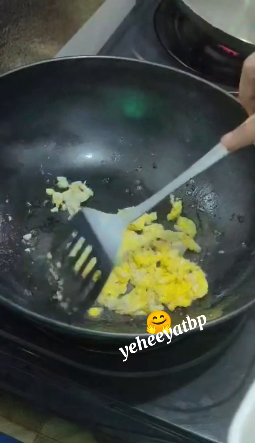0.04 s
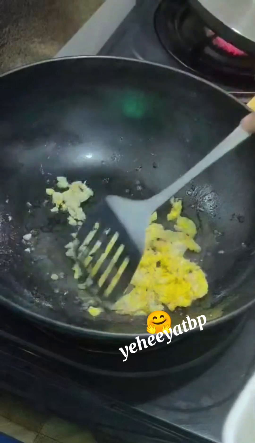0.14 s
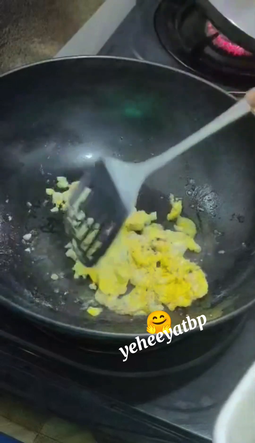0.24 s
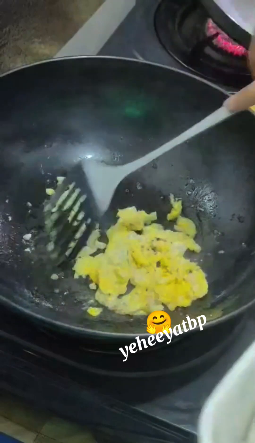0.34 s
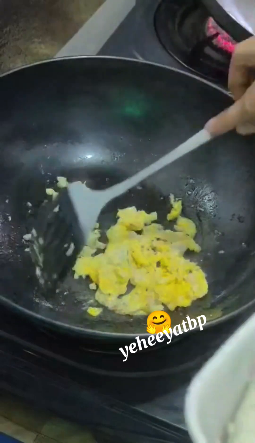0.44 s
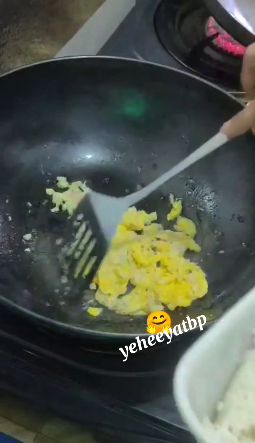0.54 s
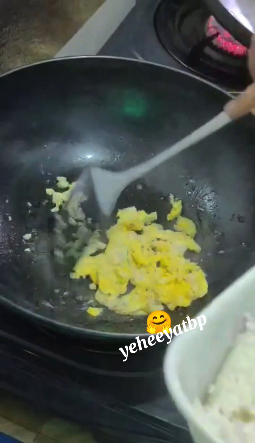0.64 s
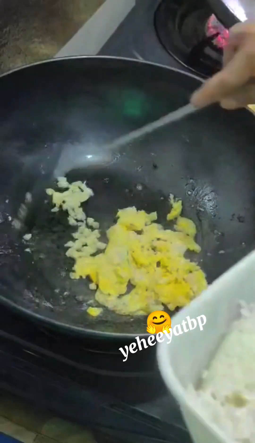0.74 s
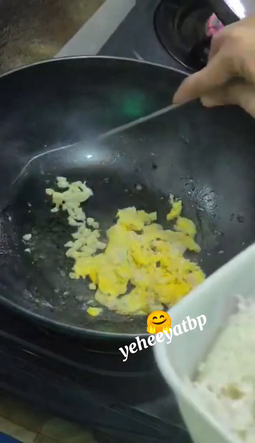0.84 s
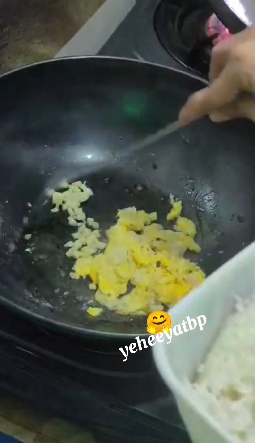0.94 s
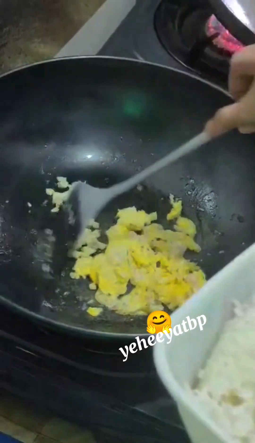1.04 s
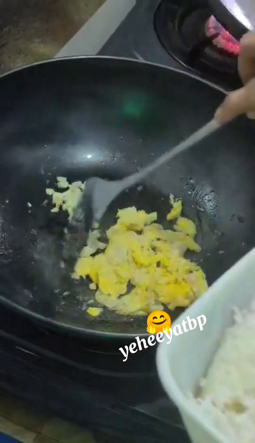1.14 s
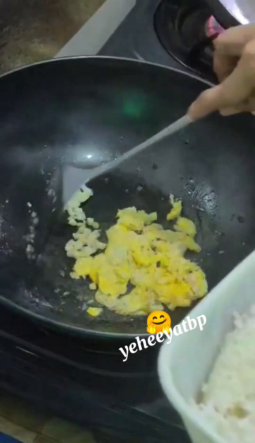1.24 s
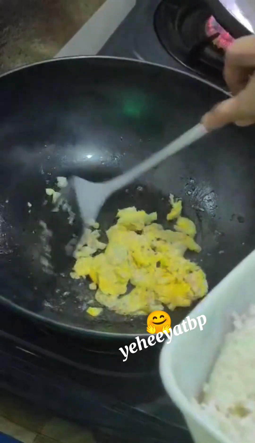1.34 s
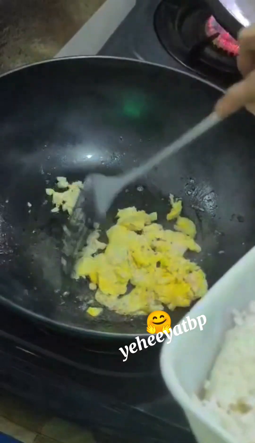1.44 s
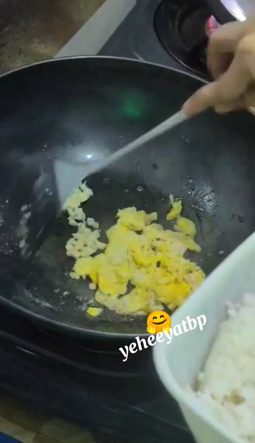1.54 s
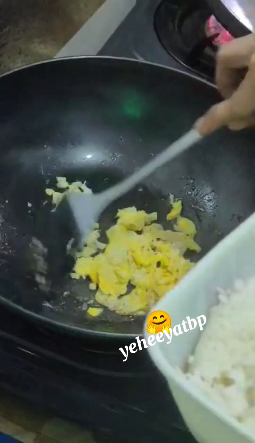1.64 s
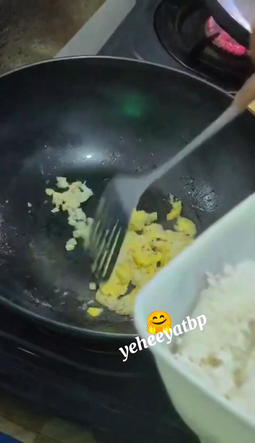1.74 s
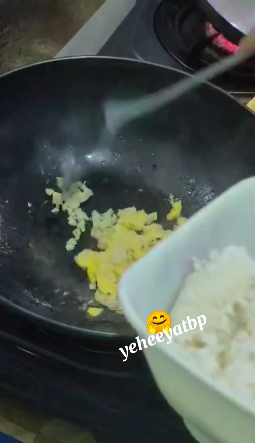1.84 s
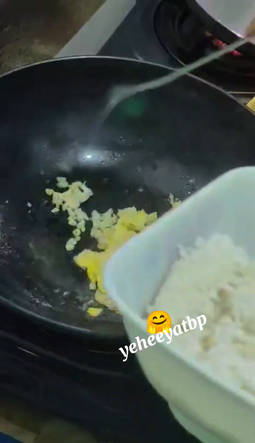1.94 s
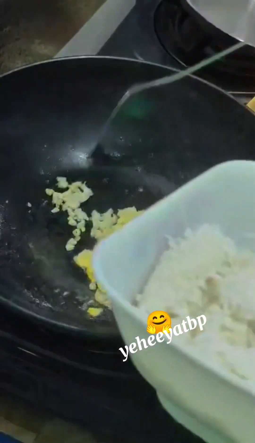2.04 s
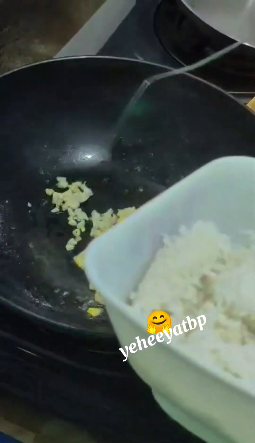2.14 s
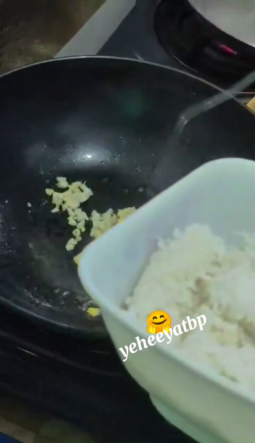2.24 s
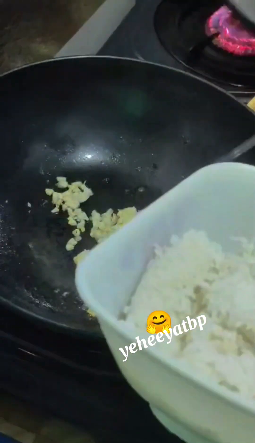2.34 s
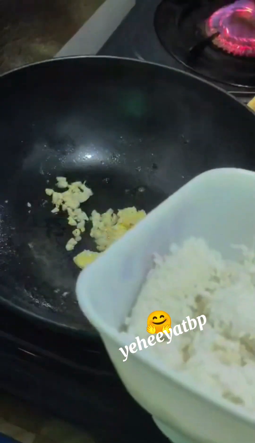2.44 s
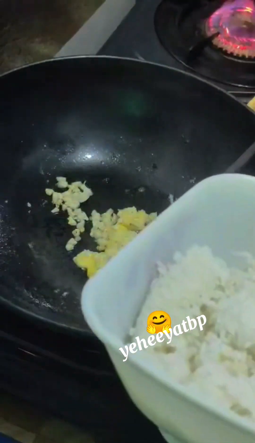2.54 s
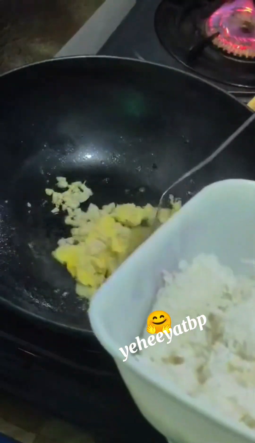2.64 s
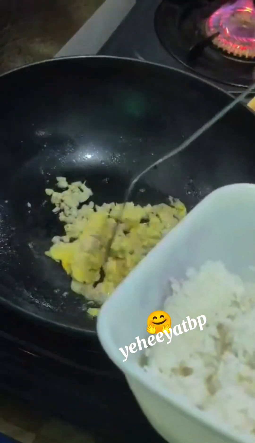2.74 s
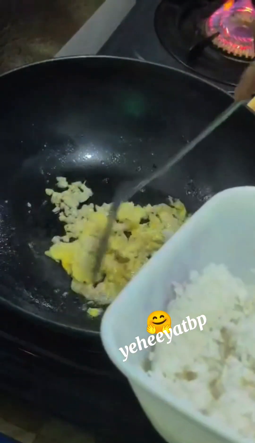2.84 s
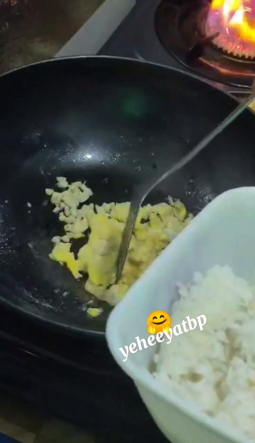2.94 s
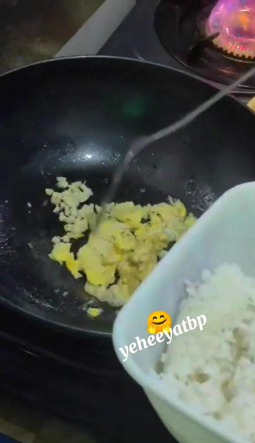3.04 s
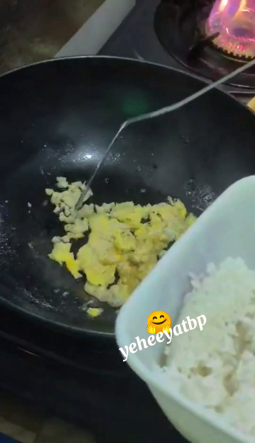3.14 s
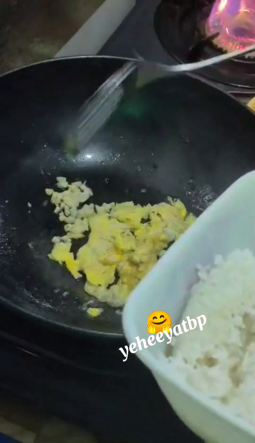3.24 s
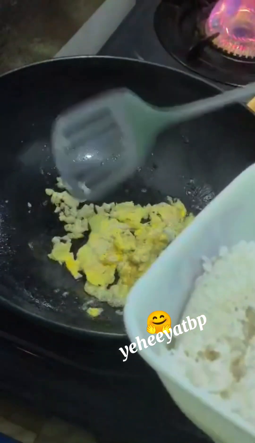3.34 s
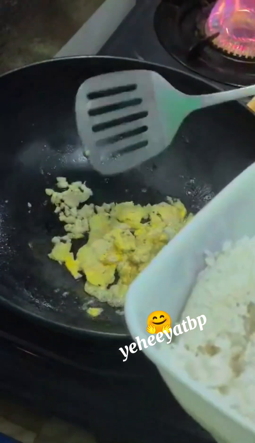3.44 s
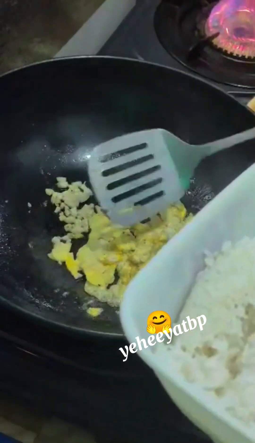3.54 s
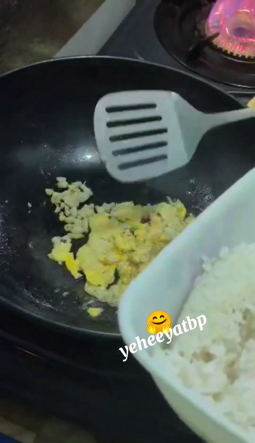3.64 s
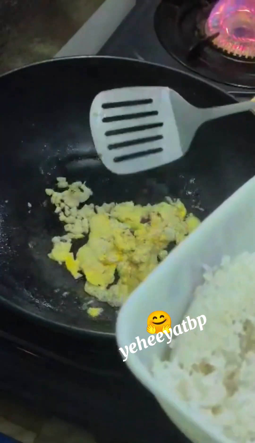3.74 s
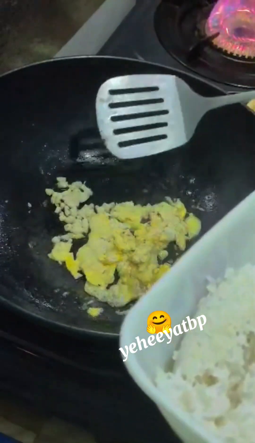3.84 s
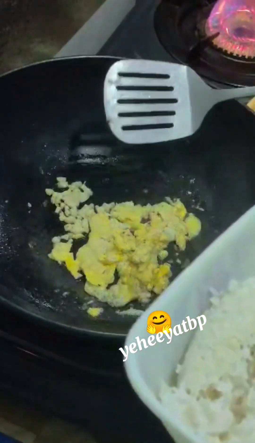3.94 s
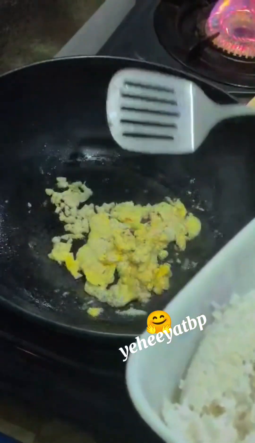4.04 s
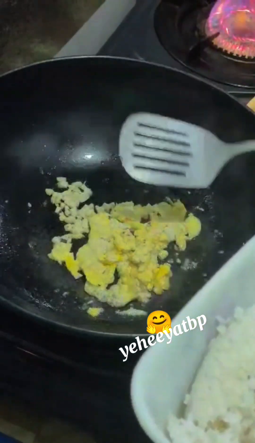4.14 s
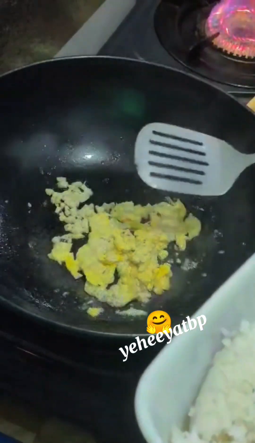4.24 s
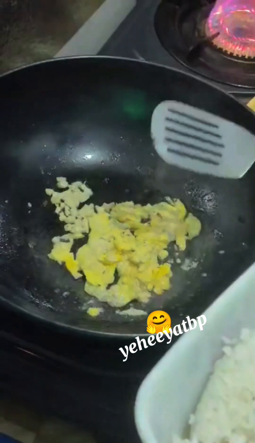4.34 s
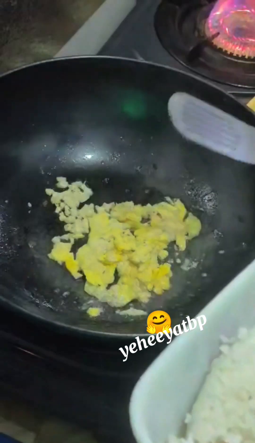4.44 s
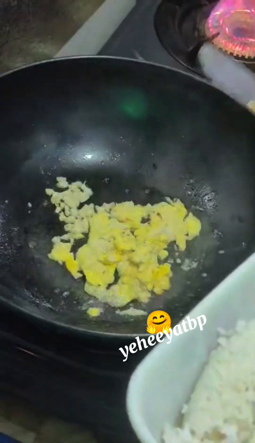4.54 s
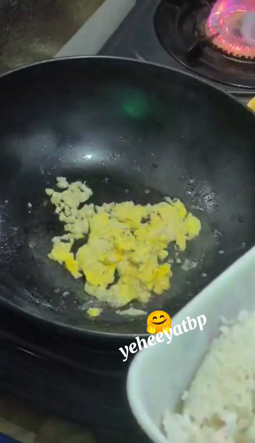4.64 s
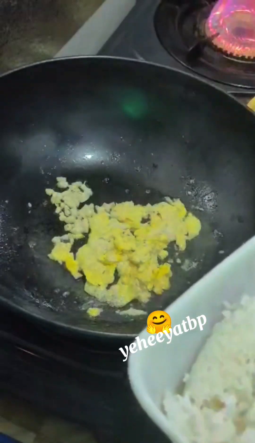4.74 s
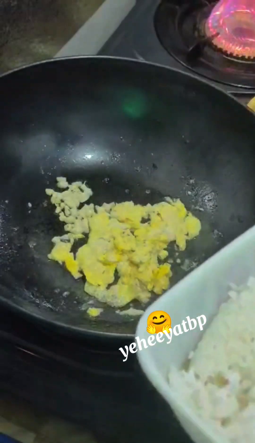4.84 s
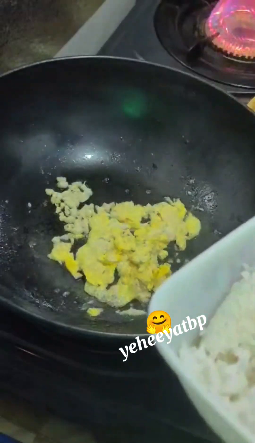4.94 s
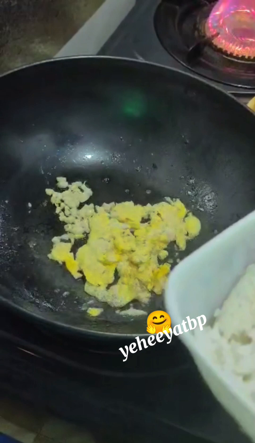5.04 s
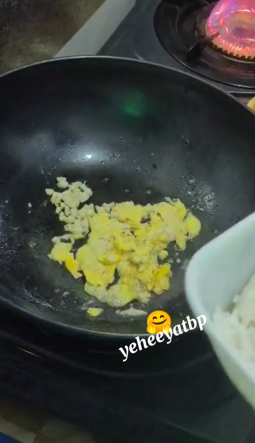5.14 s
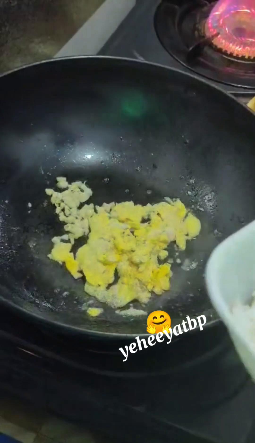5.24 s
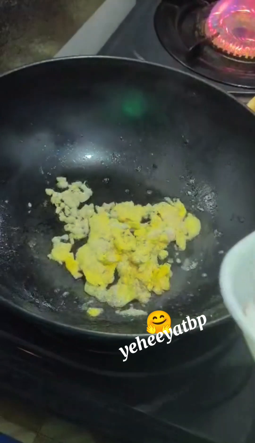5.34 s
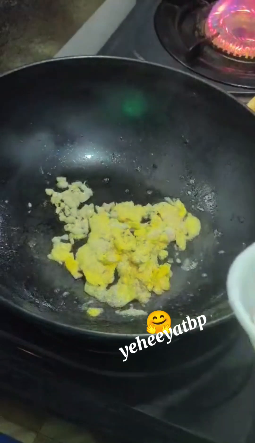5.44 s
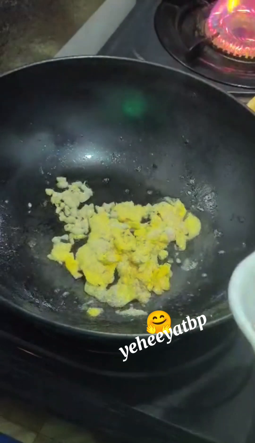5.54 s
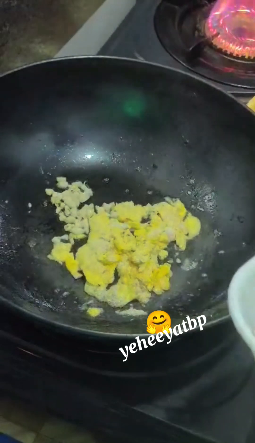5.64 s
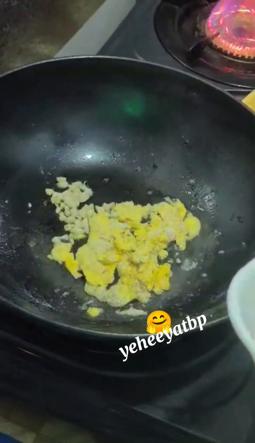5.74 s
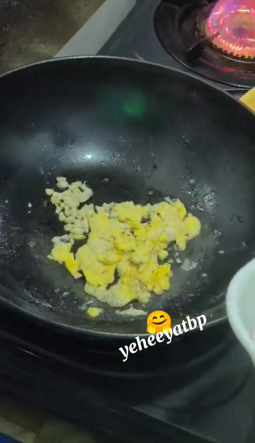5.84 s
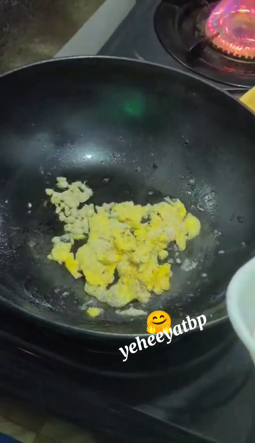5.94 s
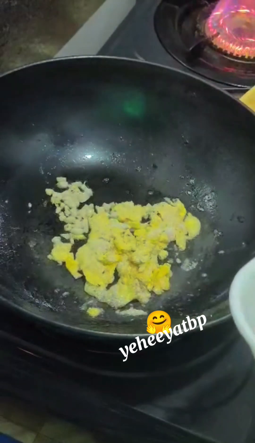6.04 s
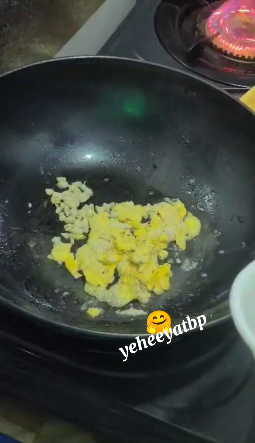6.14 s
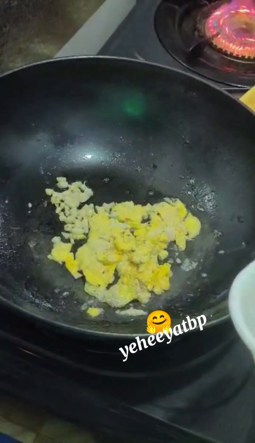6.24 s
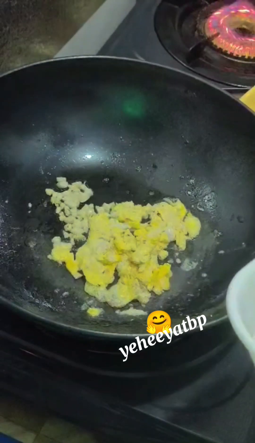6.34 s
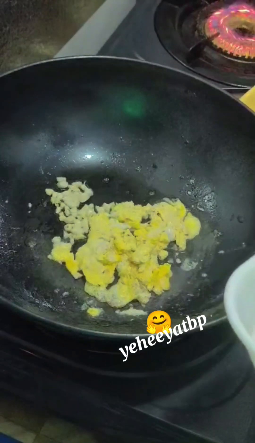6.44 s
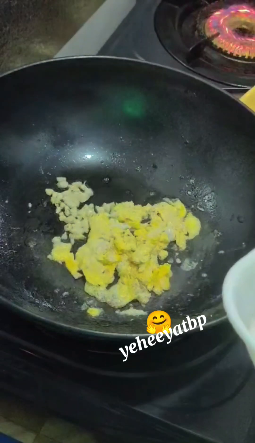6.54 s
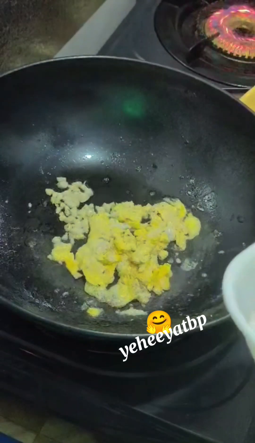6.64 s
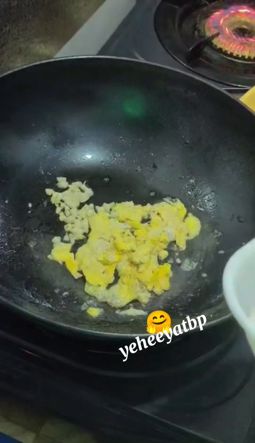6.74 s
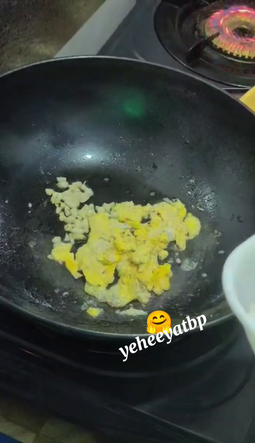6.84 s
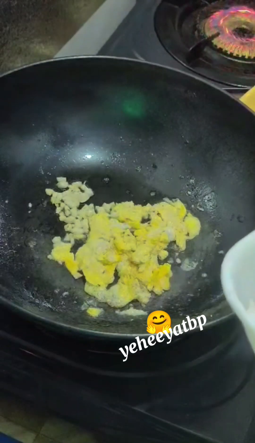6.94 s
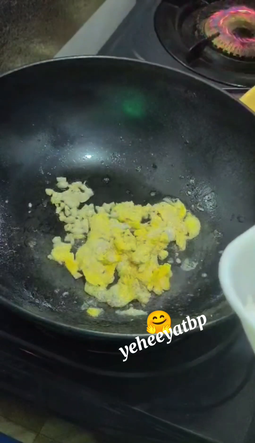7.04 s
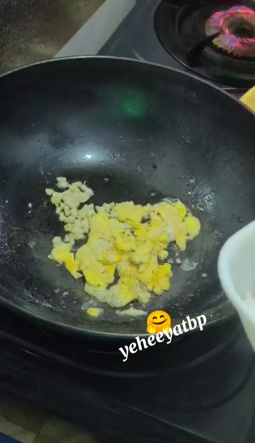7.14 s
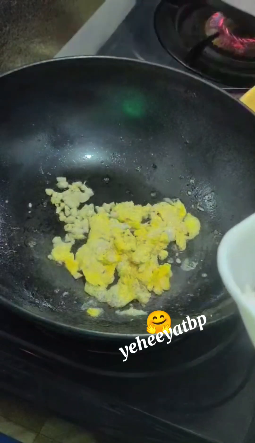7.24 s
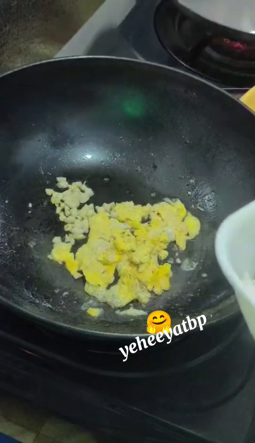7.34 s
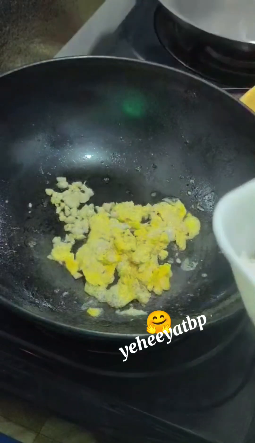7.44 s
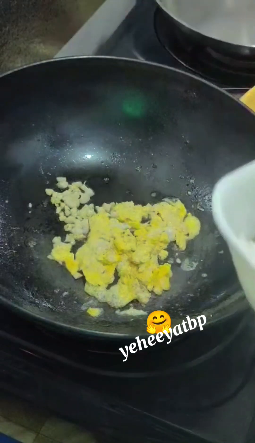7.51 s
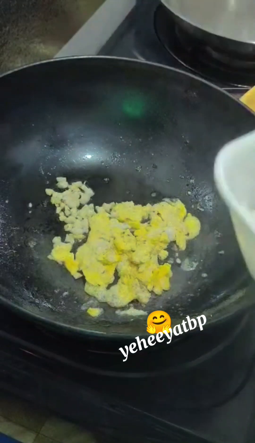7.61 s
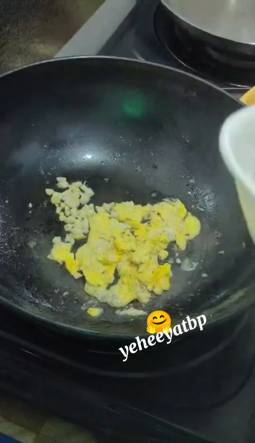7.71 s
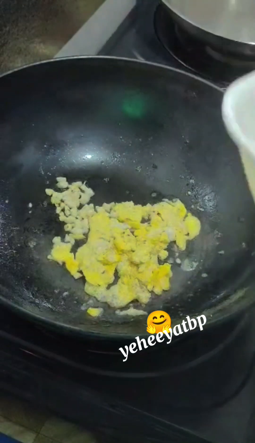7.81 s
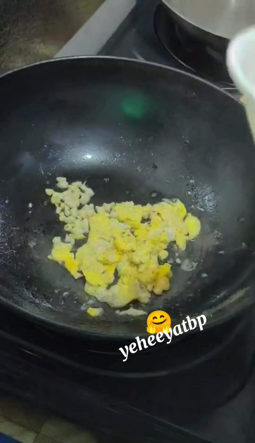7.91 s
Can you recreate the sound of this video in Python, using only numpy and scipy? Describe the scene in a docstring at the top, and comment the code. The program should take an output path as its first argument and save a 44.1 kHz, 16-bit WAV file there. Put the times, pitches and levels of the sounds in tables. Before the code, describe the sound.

A metal spatula clanks and scrapes through frying egg, leaving popping oil, a faint fluttering flame and a pot set down.

```python
"""Egg sizzles in a wok in a small kitchen, each bursting bubble a tiny impulse. For the first 4.5 s a steel
spatula knocks, scrapes and slides through it, exciting the modes of the bowl; then it is laid aside. From
1.4 s the oil spits, and later things are shifted nearby. Near 6 s something hollow is pushed along the
counter. At 6.4 s the back burner starts to flutter, and at 7.6 s it flares as a pot is set down on it.
All is heard at the two microphones of a phone held just above the stove."""
import sys
import numpy as np
from scipy import signal
from scipy.fft import rfft, irfft
from scipy.io import wavfile
from scipy.ndimage import uniform_filter1d

SR = 44100
rng = np.random.default_rng(int(sys.argv[2]) if len(sys.argv) > 2 else 0)


def inscribe(sig):
    """Save sig as 16-bit PCM at rate SR to the path in sys.argv[1].

    A 1-D sig is mono; a 2-D sig holds one channel per row.
    Samples are clipped to [-1, 1] before scaling.
    """
    pcm = np.round(np.clip(np.atleast_2d(sig).T, -1, 1) * 32767)
    wavfile.write(sys.argv[1], SR, pcm.astype(np.int16))


N = 351469
TIME = np.arange(N) / SR

# Levels in the tables are relative: each source applies its own gain.
# spectrum of the kitchen air: frequency_hz, level_db
AIR_SPECTRUM = [(20, 16), (100, 0.5), (250, 0.5), (500, 11.5), (900, -10.5), (2000, -26), (12000, -6)]
# spectrum of the deep rumble of hand, stove and flame: frequency_hz, level_db
RUMBLE_SPECTRUM = [(20, -11), (40, 1.5), (75, 1.5), (120, 1.5), (250, -9.5), (800, -34.5)]
# the hand shifts its grip on the phone: start_s, hold_s, level_db
GRIPS = [(4.02,0.028,-62), (4.34,0.049,-62.5), (5.26,0.13,-51.5)]
# spectrum of the burner's roar: frequency_hz, level_db
ROAR_SPECTRUM = [(60, -23), (115, -35), (155, 7.5), (200, -5.5), (260, 3), (340, -4), (450, -20.5),
                 (900, -20.5), (2500, -65)]
# the flame lifts and catches again: start_s, pitch_hz, note_db, boom_db
GULPS = [(6.454,250,-57,-61.5), (6.485,292,-55.5,-68), (6.526,240,-51,-55), (6.575,243,-58,-58),
         (6.621,234,-53,-51), (6.724,275,-51,-53), (6.766,242,-61,-54), (6.829,254,-49,-52),
         (6.865,270,-56,-54), (6.964,305,-47,-48.5), (7.008,251,-47,-63), (7.048,290,-59,-48),
         (7.098,248,-45.5,-48.5), (7.194,253,-51.5,-48.5), (7.272,225,-46,-52), (7.348,250,-60.5,-52),
         (7.385,250,-51.5,-60), (7.425,250,-53.5,-63.5), (7.493,243,-45,-52)]
# soft rubs of the spatula sliding through the egg, and of things shifted nearby:
# start_s, length_s, pitch_hz, level_db
RUBS = [(0.69, 0.033, 1260, -41), (1.053, .11, 577, -56), (1.215, 0.084, 703, -50.5),
        (1.379, 0.095, 590, -56.5), (4.023, 0.044, 1076, -60.5), (4.639, 0.04, 925, -69.5),
        (4.726, 0.048, 1870, -65), (4.821, 0.11, 992, -65.5), (5.067, 0.05, 532, -54),
        (6.67, 0.063, 1600, -54), (6.678, 0.054, 430, -59), (7.608, 0.013, 700, -34)]
# soft contacts of food, tub and hand: start_s, level_db, pitch_hz
BUMPS = [(1.624, -45.5, 540), (1.683, -47.5, 427), (2.007, -58, 503), (2.028, -58, 220), (2.17, -49, 460),
         (2.179, -59.5, 253), (4.034, -52, 514), (4.045, -54.5, 179), (5.244, -48.5, 484),
         (5.699, -51.5, 275)]
# resonances of the hollow object: pitch_hz, width_hz, level_db
HOLLOW_MODES = [(487, 73, 9), (585, 40, 4), (1035, 38, 12.5), (1770, 240, -4.5), (2550, 430, -6)]
# its jerks along the counter: start_s, hold_s, level_db
PUSHES = [(5.845,0.044,-43), (5.995,0.058,-47), (6.1,0.13,-61), (6.285,0.0052,-53)]
# how hard the egg fries: time_s, fizz_db
FRYING = [(0.0, -46), (0.11, -47.5), (1.78, -51.5), (2.1, -58), (2.44, -60), (2.73, -45.5), (3.15, -47),
          (4.24, -50), (4.95, -58.5), (5.3, -54), (5.39, -46.5), (5.68, -57.5), (5.97, -87), (6.24, -56),
          (6.37, -56), (7.43, -60.5), (7.84, -53), (7.97, -51)]
# hot oil boils up where wet egg settles: start_s, hold_s, level_db
BOILS = [(1.18,0.016,-45), (1.975,0.0063,-41), (2.355,0.052,-49), (2.94,0.16,-43), (3.45,0.034,-53),
         (5.71,0.19,-51.5), (6.37,0.046,-52.5), (6.86,0.2,-56)]
# filter for the fizz of the oil film: frequency_hz, gain_db
FIZZ_SPECTRUM = [(3500, -14), (5200, -7), (7200, 6), (9000, 0.5), (11000, -10.5), (13000, -5.5)]
# filter for the crackle under the egg: frequency_hz, gain_db
CRACKLE_SPECTRUM = [(300, -9), (600, -11.5), (1000, -14), (2000, 2.5), (3600, 6.5), (5000, -4), (7000, -13)]
# sharp pops of drops bursting in oil, and the bright snap of two utensil knocks (5.245 s, 5.719 s):
# start_s, pop_db, crack_re_pop_db, spray_re_pop_db
POPS = [(1.4332,-33,-4,-22), (1.486,-17,6,-27), (1.5547,-19.5,-1,-10), (1.569,-28,-3,-28),
        (1.7969,-18.5,5.5,-16), (1.821,-31,-8,-13.5), (1.8425,-34.5,23.5,6), (2.1736,-69,-5,-24.5),
        (2.3589,-36,1.5,-29), (2.657,-18.5,7.5,-17), (2.758,-31,-8,-16), (3.3329,-36.5,4,-10.5),
        (3.4523,-27,-4,-22), (3.469,-24,6,-18), (3.5315,-23.5,10.5,-17), (3.562,-26.5,5,-14),
        (3.6579,-22.5,-12,-19.5), (3.8837,-27.5,-16,-8.5), (3.8988,-30,7.5,-22), (3.9819,-29,-16.5,-28),
        (4.1141,-14,-15,-52), (4.188,-26.5,-3,-14), (4.2284,-22,-8,-19), (4.2566,-22.5,-3,-20),
        (4.3084,-19.5,-12.5,-20.5), (4.3615,-30.5,-13,-12.5), (4.494,-41,-13,-27.5), (4.533,-26,-13,-26.5),
        (4.7073,-35,-8,-18), (4.7593,-32,-5,-14), (4.9259,-50,0.5,-19.5), (4.9522,-41,8,-20),
        (4.9832,-45.5,3,-25), (5.245,-20.5,2,-12), (5.2885,-34,2,-23), (5.331,-30.5,5,-19),
        (5.4183,-30,-6,-23), (5.7191,-19.5,-4,-15), (6.3679,-20.5,-1,-18), (6.863,-37.5,4.5,-4),
        (6.87,-33,-8,-17), (6.908,-36.5,10.5,-27), (6.928,-32,-9,-33), (6.9824,-24,-5.5,-43),
        (7.4763,-24,-16,-22)]
# normal modes of the wok: pitch_hz, level_db, t60_s
WOK_MODES = [(152,-24.5,.5), (246,-20.5,.3), (288.5,-21.5,1), (411.4,0,0.13), (436.6,-10.5,.38),
             (450,-3,0.096), (513.8,-1,.2), (556,-3,.2), (614,-7,.3), (736.5,-10,0.1), (781,-8.5,0.19),
             (847,-9,.2), (1064,0,0.23), (1120,-0.5,.15), (1346,-6,.18), (1474,-7.5,.22), (1630,-7.5,.14),
             (2160,-4.5,.13), (2255,-2,.17), (2330,-3,.18), (2556,-2.5,.15), (2850,-6.5,.12),
             (3060,-10.5,.14), (3735,0.5,.16), (3790,-3,.12), (3985,-8,0.13), (4100,-5,.11), (4470,0,.13),
             (4800,-6.5,.11), (4890,-5,.13), (5465,-5.5,0.15), (6080,-3.5,.12), (6080,-5.5,0.21),
             (6500,-1.5,.11), (6865,-3.5,0.055), (7195,-3.5,0.075), (7460,-8,.1), (7650,-8,.1),
             (8177,-9,.13)]
# dense, quickly damped vibration of blade and pan: frequency_hz, level_db
STEEL_SPECTRUM = [(100, -22.5), (160, -18), (260, 2.5), (350, -4.5), (450, 10.5), (620, 2), (900, -4),
                  (1300, 6), (2200, 9.5), (3100, 6), (4300, 1.5), (5200, -12.5), (6900, 1), (8800, -10),
                  (10800, -26), (13000, -24)]
# the bowl hums on as the blade lifts clear: start_s, lowest_mode_db, next_two_modes_db
HUMS = [(0.069, -56.5, -48.5), (0.546, -50, -69), (0.864, -56, -55.5), (2.531, -72.5, -54.5)]
# steel sliding on cookware, and a tub slid nearby: start_s, length_s, body_db, rasp_db, edge_db
SCRAPES = [(0.009,0.024,-85,-48,-41), (0.405,0.024,-62,-46,-37.5), (0.509,0.025,-54.5,-38,-33.5),
           (0.824,0.033,-70,-40.5,-48), (0.955,0.029,-40.5,-61,-35), (0.988,0.024,-48,-65,-58),
           (1.236,0.45,-57.5,-53,-54), (1.42,0.05,-55,-41,-39.5), (1.552,0.058,-55.5,-43.5,-39.5),
           (1.816,0.062,-62,-44,-40), (2.588,0.054,-42,-38,-27), (2.957,0.069,-27,-37,-50),
           (3.447,0.028,-68,-45.5,-38.5), (3.831,0.04,-55.5,-47,-47), (4.738,0.055,-86,-51,-51.5),
           (5.284,0.19,-55.5,-60,-51.5), (5.857,0.045,-46.5,-40,-51), (6.174,0.081,-84,-59,-51),
           (6.499,0.037,-82,-46,-39.5), (7.275,0.048,-83,-55.5,-48), (7.674,0.061,-41.5,-39,-41),
           (7.812,0.02,-39,-33.5,-35), (7.833,0.027,-37,-31.5,-33)]
# timbre of a scrape in the wok and beside it: t60_s, uneven_db
SCRAPE_IN_WOK = (0.022, 2.5)
SCRAPE_ASIDE = (0.01, 1.5)
# steel striking cookware:
# start_s, boom_db, body_db, clank_db, edge_db, chatter_s, clank_hz, ring_db, blade_t60_s
KNOCKS = [(0.067,-33.5,-20.5,-23.5,-22,0.015,1250,-17.5,0.18),
          (0.139,-34.5,-39,-37,-37,0.0082,1090,-22,0.22), (0.403,-58,-67,-49,-40.5,0.003,3220,-15,0.08),
          (0.544,-32,-24.5,-19,-14,0.026,2290,-16,0.096), (0.865,-31,-21,-22.5,-18,0.013,1400,-17,.13),
          (0.979,-35.5,-33,-36.5,-27.5,0.012,1250,-20,0.13), (1.486,-68,-52,-46,-35,0.0036,3380,-15,0.11),
          (1.853,-72,-58,-39,-35,0.0059,2200,-20,0.053), (2.527,-37.5,-28.5,-33,-26.5,0.0098,1100,-18,0.29),
          (2.581,-46,-37,-32,-33,0.012,1100,-24,.15), (2.713,-54,-56.5,-36,-32.5,0.0064,2370,-18,0.2),
          (2.926,-28.5,-17,-18.5,-32.5,0.028,970,-14,.15), (3.083,-58.5,-46,-35,-34,0.014,2830,-18,0.18),
          (5.244,-51.5,-39.5,-46,-32,0.008,2500,-28,.15), (5.662,-56,-42,-41,-38.5,0.035,2150,-31,0.18),
          (5.718,-50,-42.5,-34,-38,0.0016,1490,-19,0.054), (5.811,-61,-45.5,-41,-44,0.0023,2050,-22,0.098),
          (6.339,-71,-56,-44,-54,0.0031,2400,-30,0.092), (6.491,-55,-59,-36,-39,0.0027,3260,-33,0.081),
          (7.616,-28.5,-22.5,-34,-45,0.019,1005,-33,0.19), (7.651,-46,-26.5,-24,-22.5,0.009,1950,-35,0.17),
          (7.75,-34,-33,-44,-55,0.0076,1000,-33,0.16), (7.785,-36.5,-29.5,-28,-28.5,0.012,3260,-35,0.11)]
# imbalance of the two microphones: frequency_hz, left_minus_right_db
MIC_BALANCE = [(60, -1), (110, 2.5), (200, -0.5), (370, -2), (670, 2.5), (1230, 1), (2260, 0), (4130, 3.5),
               (7560, -1.5), (13800, 9)]

STIRRING_ENDS_S, FLUTTER_FROM_S, POT_DOWN_S = 4.5, 6.43, 7.6
RING_S = 0.4  # longest ring after a knock or scrape


def undb(db):
    """Decibels to amplitude ratio."""
    return 10 ** (np.asarray(db) / 20)


def unit(x):
    """Normalisation to rms 1."""
    return x / np.sqrt(np.mean(x ** 2) + 1e-20)


def fade(t, t60):
    """Exponential decay, 60 dB in t60 seconds."""
    return np.exp(-np.log(1000) * t / t60)


def seconds(length):
    """Time axis of a short sound."""
    return np.arange(int(length * SR) + 2) / SR


def add(out, start_s, x):
    """Superposition of x on out from start_s."""
    i = max(int(start_s * SR), 0)
    out[:, i:i + x.shape[1]] += x[:, :N - i]


def envelope(t, rise_s, t60, hold_s=0):
    """Linear rise, hold and exponential decay."""
    return np.minimum(t / rise_s, 1) * fade(np.maximum(t - rise_s - hold_s, 0), t60)


def swells(events, rise_s, t60):
    """Sum of envelopes, one for each row of start_s, hold_s, level_db."""
    out = np.zeros((1, N))
    for start_s, hold_s, db in events:
        t = seconds(rise_s + hold_s + t60)
        add(out, start_s, undb(db) * envelope(t, rise_s, t60, hold_s)[None])
    return out[0]


def band(x, hz, kind, order=3):
    """Butterworth filter."""
    return signal.sosfilt(signal.butter(order, hz, kind, fs=SR, output="sos"), x)


def resonate(x, hz, width_hz):
    """Second-order resonator, gain 1 at its centre."""
    return signal.lfilter(*signal.iirpeak(hz, hz / width_hz, fs=SR), x)


def resonate_twice(x, hz, width_hz):
    """Two equal resonators in cascade."""
    return resonate(resonate(x, hz, width_hz), hz, width_hz)


def colour(x, points, size=2048):
    """Minimum-phase filter through rows of frequency_hz, gain_db."""
    hz, db = np.transpose(points)
    bins_hz = np.maximum(np.fft.rfftfreq(size, 1 / SR), 1)
    gain = undb(np.interp(np.log(bins_hz), np.log(hz), db))
    cepstrum = irfft(np.log(gain))
    cepstrum[1:size // 2] *= 2
    cepstrum[size // 2 + 1:] = 0
    response = irfft(np.exp(rfft(cepstrum)))
    return signal.fftconvolve(x, response[None], axes=1)[:, :x.shape[1]]


def noise(n, apart_hz=900):
    """Spatial coherence: noise at two close microphones is alike in the bass, unrelated in the treble."""
    mid, side = rng.standard_normal((2, n))
    side = band(side, apart_hz, "highpass", order=1) + .22 * rng.standard_normal(n)
    return np.array([mid + side, mid - side])


def wander(rate_hz):
    """Smooth random modulation with a spread near 1."""
    step = int(SR / rate_hz)
    stairs = np.repeat(rng.standard_normal(N // step + 1), step)
    return 1.3 * uniform_filter1d(stairs, step)[:N]


def clicks(n, per_s, spread_db):
    """Shot noise: impulses of random time, sign and size."""
    count = int(per_s * n / SR) + 1
    when, size, sign = rng.random((count, 3)).T
    sizes = undb(spread_db * np.minimum(-np.log(1 - size), 5)) * np.sign(sign - .5)
    return np.bincount((when * n).astype(int), sizes, n)


def background(air_db=-73, resting_hand_db=-83):
    """Airborne kitchen noise, with structure-borne rumble from the hand and from blows on the stove."""
    air = unit(colour(noise(N), AIR_SPECTRUM)) * undb(air_db + wander(15))
    hand = undb(resting_hand_db) + swells(GRIPS, rise_s=0.025, t60=0.55)
    thuds = swells([(s, 0, boom_db - 25.5) for s, boom_db, *_ in KNOCKS], rise_s=0.008, t60=0.6)
    rumble = unit(colour(noise(N), RUMBLE_SPECTRUM))
    return air + rumble * np.hypot(hand, thuds) * undb(-1)


def flame(flutter_db=-57.5, flare_db=-45.5, throat_hz=160, puff_hz=330):
    """Combustion noise: a low roar, with a note and a boom of the burner's throat at each re-ignition."""
    flutter = undb(flutter_db) * np.clip((TIME - FLUTTER_FROM_S) / 0.13, 0, 1)
    flare = swells([(POT_DOWN_S, 0, flare_db)], rise_s=0.15, t60=0.56)
    gulps, t = np.zeros((2, N)), seconds(0.35)
    tone = lambda hz: unit(np.sin(2 * np.pi * (hz * t + rng.random())))
    for start_s, pitch_hz, note_db, boom_db in GULPS:
        puff = unit(resonate_twice(noise(len(t)), puff_hz, puff_hz)) * undb(-10)
        note = (tone(pitch_hz) + puff) * envelope(t, rise_s=0.0072, t60=0.11)
        boom = tone(throat_hz) * envelope(t, rise_s=0.0072, t60=0.19)
        add(gulps, start_s, note * undb(note_db) + boom * undb(boom_db))
    roar = unit(colour(noise(N), ROAR_SPECTRUM))
    rumble = unit(colour(noise(N), RUMBLE_SPECTRUM)) * undb(-11)
    return (roar + rumble) * (flutter + flare) + gulps


def rubs(relative_width=0.47):
    """Friction noise: brief soft sliding drives one broad resonance."""
    out = np.zeros((2, N))
    for start_s, length_s, hz, db in RUBS:
        t = seconds(length_s)
        slips = noise(len(t)) * np.sqrt(np.abs(np.sin(np.pi * t / t[-1])))
        add(out, start_s, undb(db) * unit(resonate_twice(slips, hz, hz * relative_width)))
    return out


def bumps(t60=0.29, relative_width=0.33):
    """Damped resonance: a soft contact wakes only a short, hollow note."""
    out, t = np.zeros((2, N)), seconds(1.0)
    for start_s, db, hz in BUMPS:
        push = noise(len(t)) * fade(t, t60) * (1 - np.exp(-t / 0.00027))
        note = resonate_twice(push, hz, hz * relative_width)
        add(out, start_s, note * undb(db) / np.std(note[:, :int(.03 * SR)]))
    return out


def hollow_drag():
    """Forced vibration: rough sliding on the counter drives the modes of a hollow body."""
    slips = noise(N) * undb(1.4 * wander(150))
    body = unit(sum(undb(db) * resonate(slips, hz, width_hz) for hz, width_hz, db in HOLLOW_MODES))
    return band(body, 164, "highpass") * swells(PUSHES, rise_s=0.0088, t60=0.3) * undb(1)


def ticks(strongest_hz=2800, db_per_octave=-3):
    """Impulse response: single wet bubbles snap through broad resonances, some dull and some bright."""
    out = 0
    for hz in np.geomspace(1900, 7000, 5):
        bursts = clicks(N, per_s=22, spread_db=3.6)
        at_mics = np.array([bursts * rng.uniform(.3, 1, N) for _ in range(2)])
        octaves_away = abs(np.log2(hz / strongest_hz))
        out = out + unit(resonate_twice(at_mics, hz, hz)) * undb(db_per_octave * octaves_away)
    return unit(out)


def patchy_sizzle(edges_hz, per_s, spread_db, together_db, separate_db):
    """Amplitude modulation: bands of tiny clicks flicker in level, separately and together."""
    out = 0
    for low_hz, high_hz in zip(edges_hz[:-1], edges_hz[1:]):
        shared = clicks(N, per_s, spread_db)
        bursts = np.array([0.33 * shared + clicks(N, per_s, spread_db) for _ in range(2)])
        flicker = undb(separate_db * np.minimum(wander(30), 1))
        out = out + band(bursts, [low_hz, high_hz], "bandpass", order=2) * flicker
    return out * undb(together_db * wander(45))


def sizzle(brisk_db=-49, crackle_exponent=1.71):
    """Boiling as shot noise: fine fizz of the oil film, coarser crackle and ticks from under the egg."""
    fizz_gain = undb(np.interp(TIME, *np.transpose(FRYING)))
    crackle_gain = undb(brisk_db - 5.5) * (fizz_gain / undb(brisk_db)) ** crackle_exponent
    boils = swells(BOILS, rise_s=0.014, t60=0.23)
    # a blow throws wet egg on hot steel and the crackle flares
    throws = [(s, 0, clank_db - 36.5) for s, _, _, clank_db, *_ in KNOCKS if s < STIRRING_ENDS_S]
    flares = swells(throws, rise_s=0.062, t60=0.42)
    high = patchy_sizzle(np.geomspace(3000, 14000, 13), 300, spread_db=3.6, together_db=2.5, separate_db=6)
    low = patchy_sizzle(np.geomspace(300, 7000, 11), 700, spread_db=-.5, together_db=.5, separate_db=8.5)
    fizz = unit(colour(high, FIZZ_SPECTRUM))
    crackle = unit(colour(low, CRACKLE_SPECTRUM)) + ticks() * undb(-7.5)
    return fizz * np.hypot(fizz_gain, boils) + crackle * np.hypot(crackle_gain, flares)


def pops(pop_hz=7740, pop_width_hz=2800, echo_s=0.0043, echo_db=-4):
    """Transients: spitting oil or a knock's snap, as a pop and crack, a quick echo and a fine patter."""
    out, t = np.zeros((2, N)), seconds(0.25)
    impulse = np.eye(1, len(t))
    for start_s, pop_db, crack_db, spray_db in POPS:
        hz = pop_hz * np.exp(0.03 * rng.standard_normal())
        pop = resonate_twice(impulse, hz, pop_width_hz)
        crack = band(noise(len(t)) * fade(t, t60=0.0072), 1600, "highpass", order=2)
        burst = pop / np.abs(pop).max() + undb(crack_db) * crack / np.abs(crack).max()
        burst = burst + undb(echo_db) * np.roll(burst, int(echo_s * SR), axis=1)  # off the bowl
        specks = np.array([clicks(len(t), per_s=1500, spread_db=2) for _ in range(2)])
        patter = unit(band(specks, [1600, 4500], "bandpass", order=2))
        spray = unit(unit(colour(specks, FIZZ_SPECTRUM)) + .5 * patter) * fade(t, t60=0.26)
        add(out, start_s, undb(pop_db) * (burst + undb(spray_db) * spray))
    return out * undb([[-4], [-2]])  # a little to the right


def wok_modes(t):
    """Normal modes: each rings as a damped complex sinusoid."""
    return np.array([undb(db) * fade(t, t60) * np.exp(2j * np.pi * hz * t) for hz, db, t60 in WOK_MODES])


def wok_ring(modes, spot_db=1.5, apart_hz=1300):
    """Modal superposition: each spot weights the modes anew; high ones differ in phase at the mics."""
    count = len(WOK_MODES)
    phase_spread = np.minimum(np.array(WOK_MODES)[:, 0] / apart_hz, 1)
    phase = rng.uniform(0, 2 * np.pi, count) + rng.standard_normal((2, count)) * phase_spread
    weights = undb(spot_db * rng.standard_normal(count)) * np.exp(1j * phase)
    return (weights @ modes).imag


def hums():
    """Free vibration: the released bowl swings in its lowest modes, wavering as it rocks on the burner."""
    out = np.zeros((2, N))
    modes = wok_modes(seconds(1.0)).imag
    lowest, next_pair = modes[0], modes[1] + modes[2]
    for start_s, *levels_db in HUMS:
        for ring, db in zip((lowest, next_pair), levels_db):
            add(out, start_s, undb(db) * ring[None] / np.std(ring[:int(.05 * SR)]))
    return out * undb(-2.5 * wander(29) + 2.5 * wander(60))


def cookware(force, levels_db, span_s, t60, uneven_db, ring=0):
    """Convolution: a contact force shakes the metal, heard in four bands: boom, body, clank and edge."""
    t = seconds(RING_S)
    # the point of contact favours some groups of blade resonances and misses others
    hz = np.arange(700, 14000, 200)
    favour_db = uneven_db * rng.standard_normal(len(hz)) * (hz > hz[0])
    response = unit(colour(noise(len(t)), STEEL_SPECTRUM)) * fade(t, t60)
    response = colour(response, np.transpose([hz, favour_db]))
    vibration = signal.fftconvolve(force[None], response, axes=1)
    # the wok's ring builds up with the energy delivered
    energy = np.cumsum(np.pad(force, (0, len(t))) ** 2)[:len(t)]
    vibration[:, :len(t)] += ring * np.sqrt(energy)
    bands_hz = [110, 310], [360, 950], [850, 5000], [5000, 16000]
    parts = [band(vibration, edges, "bandpass", order=4) for edges in bands_hz]
    # each level is that of the band's whole energy, packed into span_s
    packing = np.sqrt(span_s * SR / vibration.shape[1])
    return sum(unit(part) * undb(db) for part, db in zip(parts, levels_db)) * packing


def scrapes():
    """Stick-slip friction: an edge catches and slides, pressure rising and falling in a stroke."""
    out = np.zeros((2, N))
    for start_s, length_s, body_db, rasp_db, edge_db in SCRAPES:
        t = seconds(length_s)
        pressure = np.abs(np.sin(np.pi * t / t[-1])) ** 0.19
        force = clicks(len(t), per_s=2500, spread_db=3) * pressure
        t60, uneven_db = SCRAPE_IN_WOK if start_s < STIRRING_ENDS_S else SCRAPE_ASIDE
        levels_db = body_db - 11, body_db, rasp_db, edge_db
        add(out, start_s, cookware(force, levels_db, length_s, t60, uneven_db))
    return out * undb(-1)


def knocks(pressed_t60=0.6):
    """Impact and elastic rebound: the blow lands, then the springy steel chatters on the pan."""
    out, lead, ring_t = np.zeros((2, N)), seconds(0.0018), seconds(RING_S)
    modes = wok_modes(ring_t) * fade(ring_t, pressed_t60)  # extra damping under the blade
    for start_s, *levels_db, chatter_s, clank_hz, ring_db, blade_t60 in KNOCKS:
        t = seconds(chatter_s)
        taper = np.sqrt(np.abs(1 - (t / t[-1]) ** 2))
        contact = 0.23 * clicks(len(t), per_s=1000, spread_db=2) * taper
        contact[0] = 1  # the blow itself
        # a faint 2 ms lead-in softens the attack
        lead_in = 0.033 * clicks(len(lead), per_s=2000, spread_db=2) * lead / lead[-1]
        force = np.r_[lead_in, contact, np.zeros(len(lead))]
        force = force + undb(3) * resonate(force, clank_hz, clank_hz * 0.45)  # this spot's own clank
        ring = undb(ring_db) * wok_ring(modes)
        knock = cookware(force, levels_db, span_s=0.012, t60=blade_t60, uneven_db=3, ring=ring)
        add(out, start_s - lead[-1], knock)
    return out * undb(-1)


def room(x, low_t60=0.48, high_t60=0.41):
    """Reverberation: early reflections from bowl and stove, then the diffuse tail of hard walls."""
    t = seconds(0.88)
    build_up = 1 - np.exp(-t / 0.00014)
    low = band(noise(len(t)), 680, "lowpass") * fade(t, low_t60) * undb(-11)
    high = band(noise(len(t)), 710, "highpass") * fade(t, high_t60) * undb(-12)
    tail = (low + high) * build_up / np.linalg.norm(fade(t, high_t60))
    early = noise(len(t)) * fade(t, t60=0.028) * (t > .001)
    response = tail + undb(-9) * early / np.linalg.norm(early[0])
    return x + signal.fftconvolve(x, response, axes=1)[:, :N]


def scene():
    """Superposition: the sources sound into one room, over the background."""
    contacts = knocks() + hums() + scrapes() + bumps() + rubs() + hollow_drag()
    return room(contacts + sizzle() + pops() + flame()) * undb(0.5) + background()


def record(dry, top_hz=13250):
    """Frequency response: each microphone has its own colour, and the top is cut steeply."""
    left = colour(dry[[0]], [(hz, db / 2) for hz, db in MIC_BALANCE])
    right = colour(dry[[1]], [(hz, -db / 2) for hz, db in MIC_BALANCE])
    lowpass = signal.ellip(8, .2, 70, top_hz, fs=SR, output="sos")
    return signal.sosfilt(lowpass, np.vstack([left, right]))


dry = scene()
out = record(dry)
inscribe(out)
```